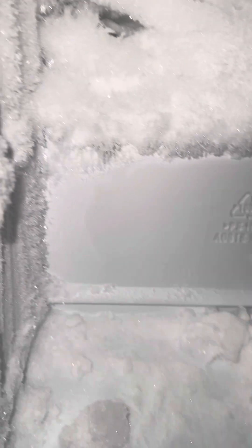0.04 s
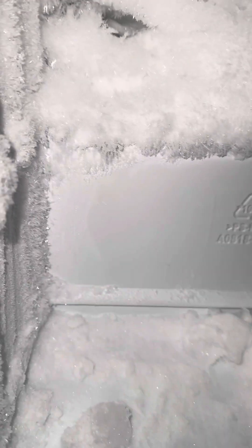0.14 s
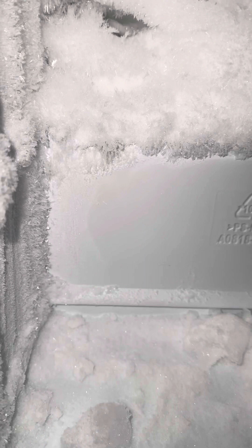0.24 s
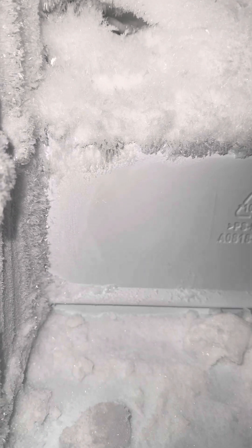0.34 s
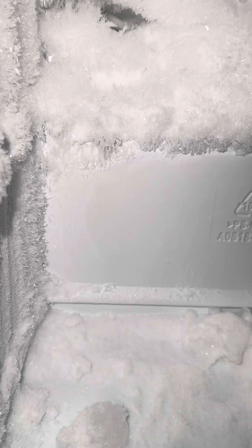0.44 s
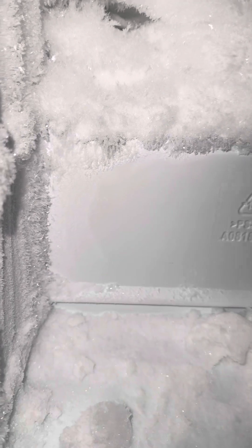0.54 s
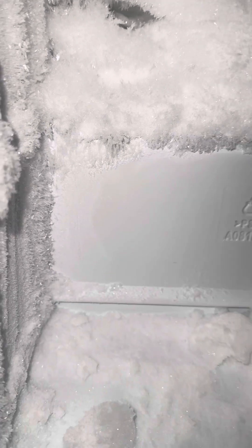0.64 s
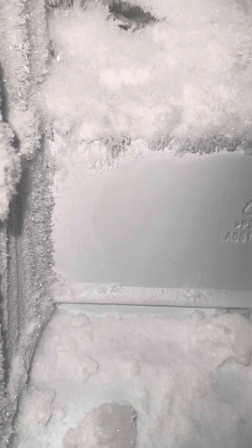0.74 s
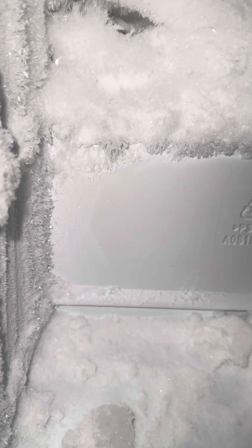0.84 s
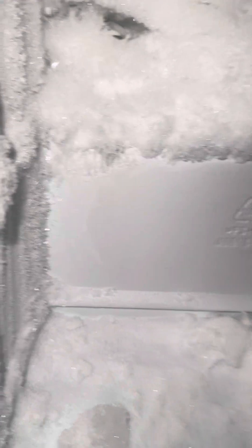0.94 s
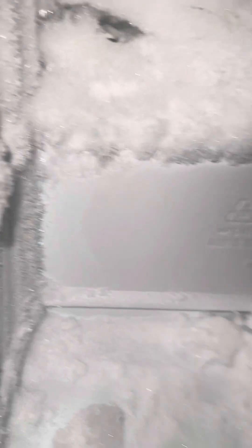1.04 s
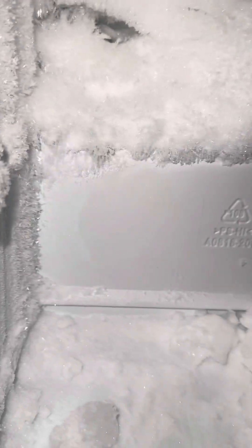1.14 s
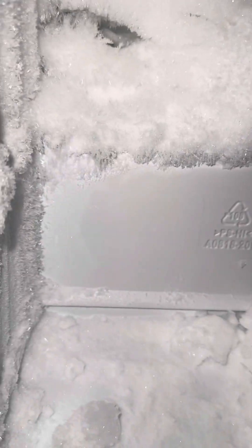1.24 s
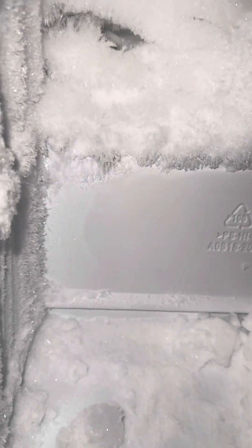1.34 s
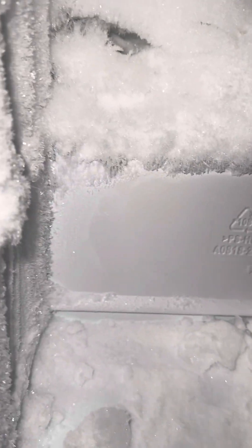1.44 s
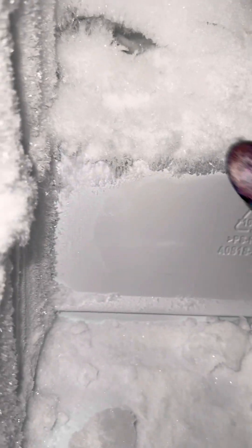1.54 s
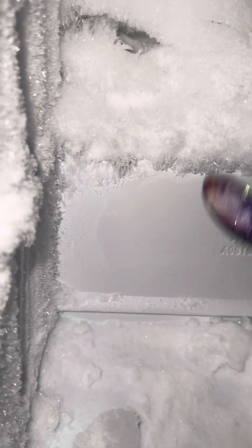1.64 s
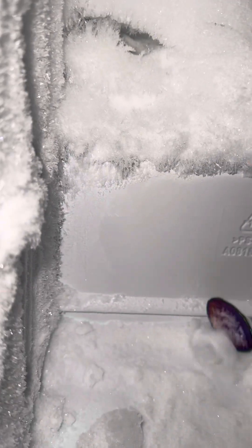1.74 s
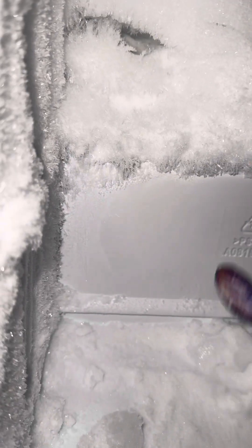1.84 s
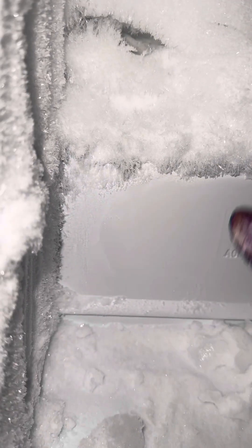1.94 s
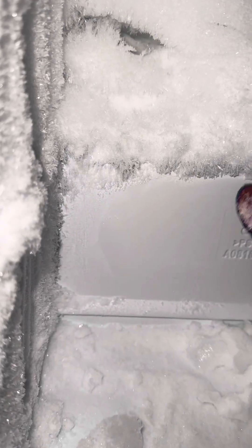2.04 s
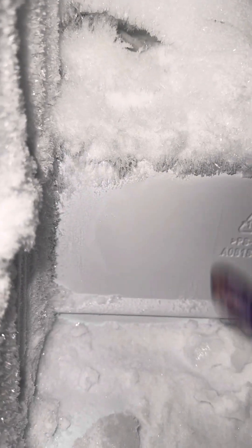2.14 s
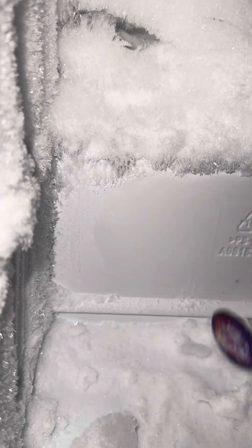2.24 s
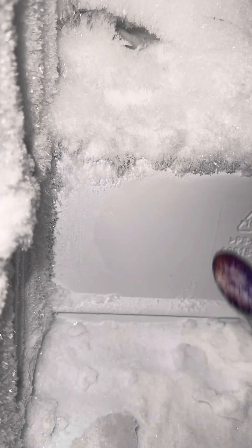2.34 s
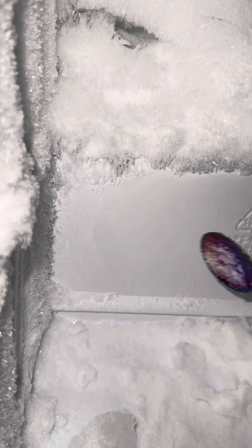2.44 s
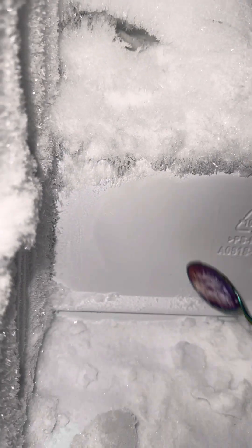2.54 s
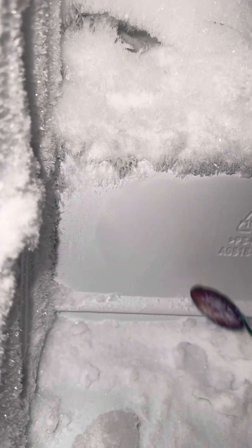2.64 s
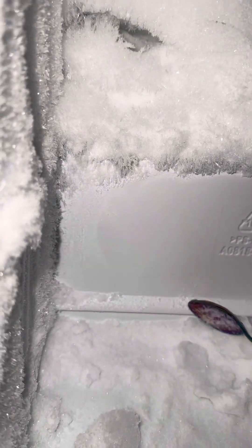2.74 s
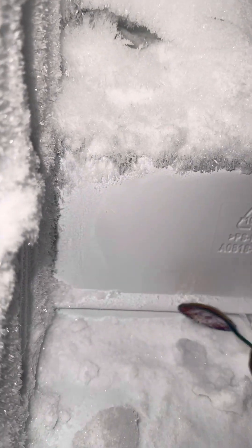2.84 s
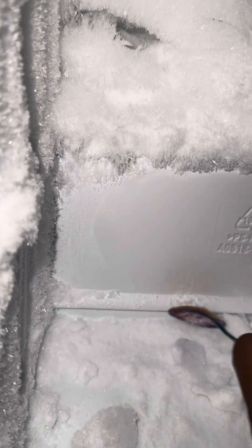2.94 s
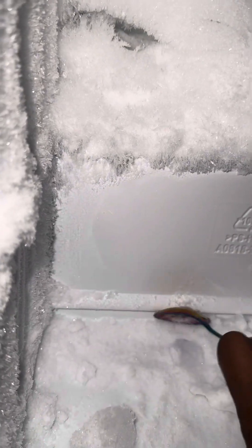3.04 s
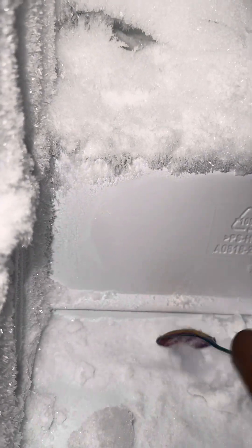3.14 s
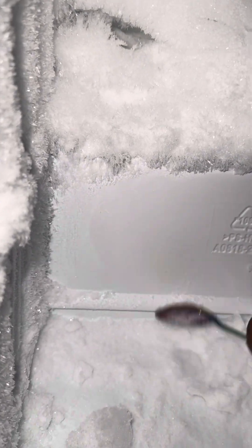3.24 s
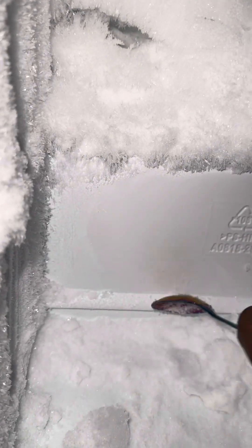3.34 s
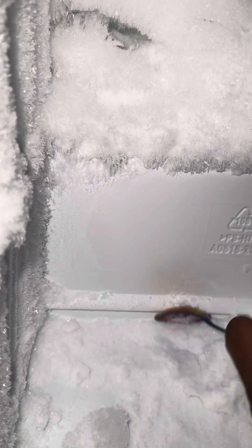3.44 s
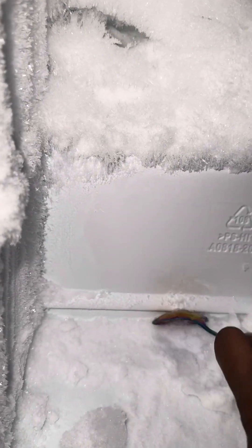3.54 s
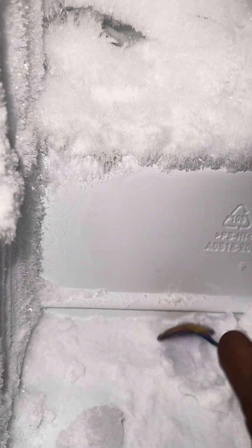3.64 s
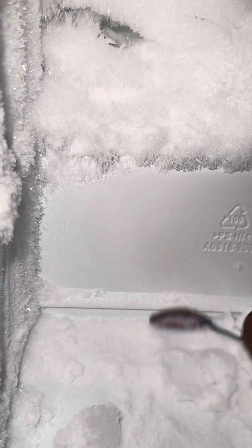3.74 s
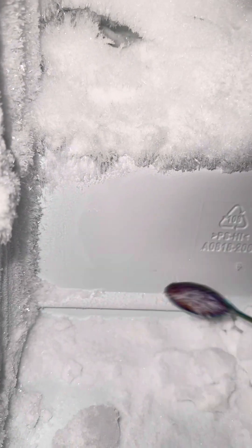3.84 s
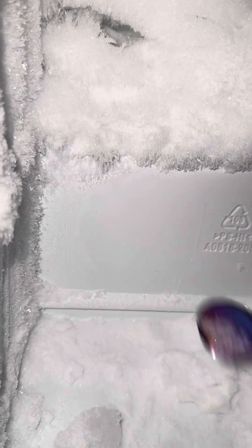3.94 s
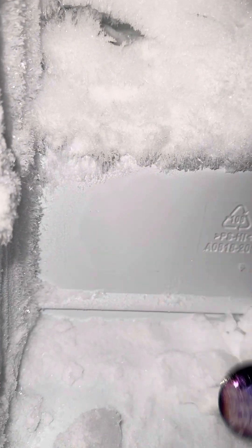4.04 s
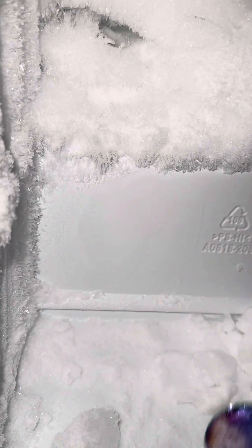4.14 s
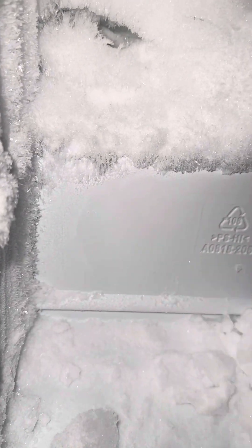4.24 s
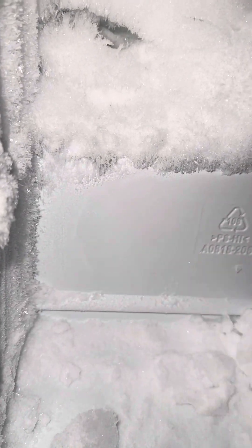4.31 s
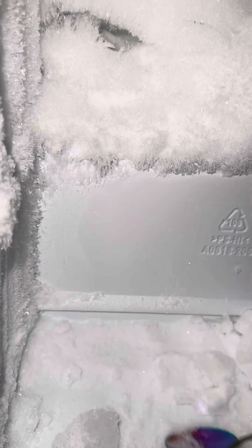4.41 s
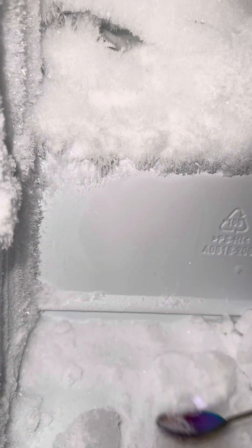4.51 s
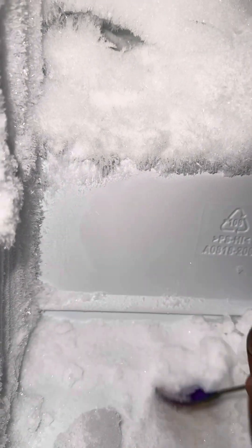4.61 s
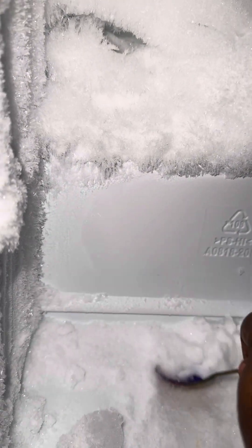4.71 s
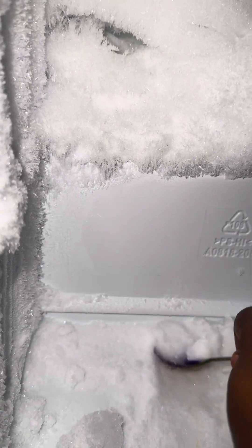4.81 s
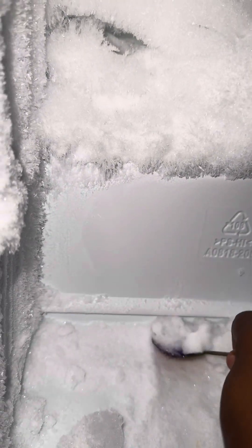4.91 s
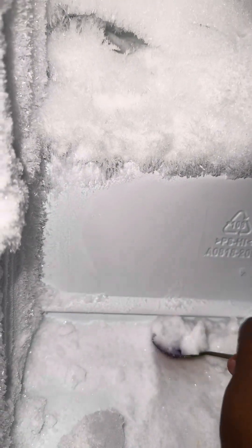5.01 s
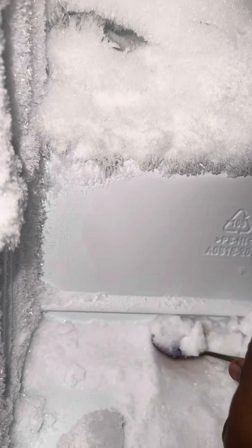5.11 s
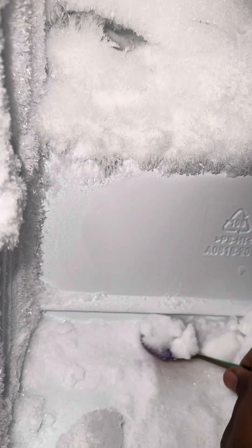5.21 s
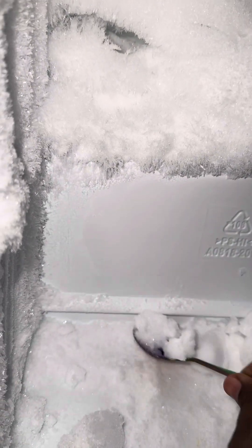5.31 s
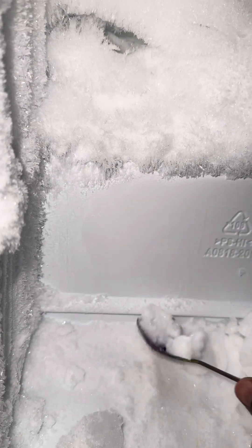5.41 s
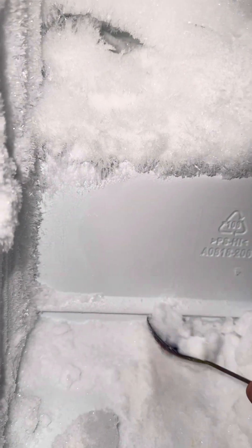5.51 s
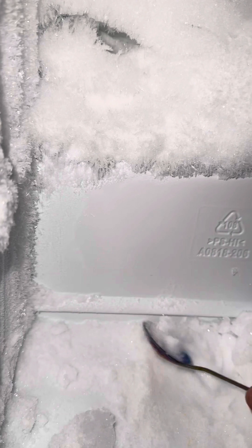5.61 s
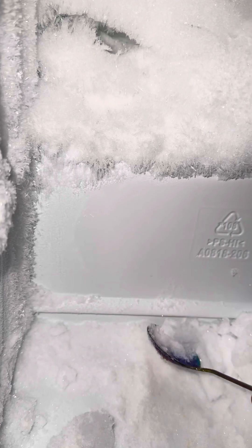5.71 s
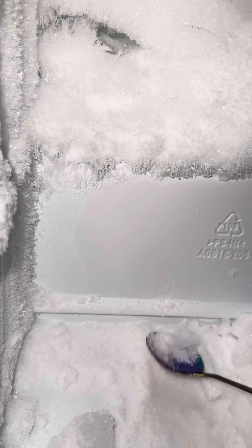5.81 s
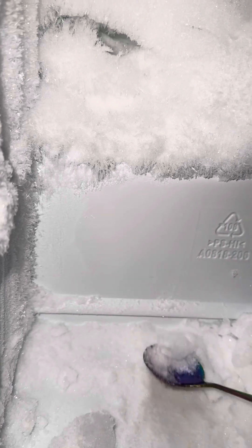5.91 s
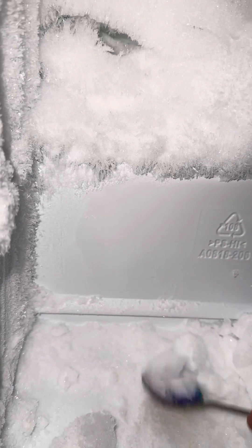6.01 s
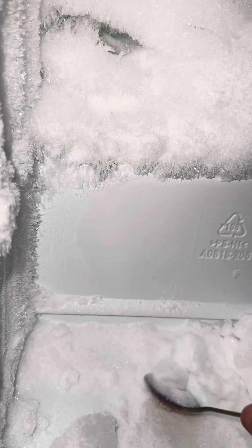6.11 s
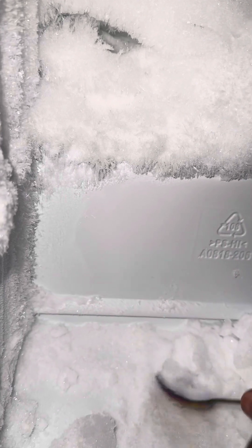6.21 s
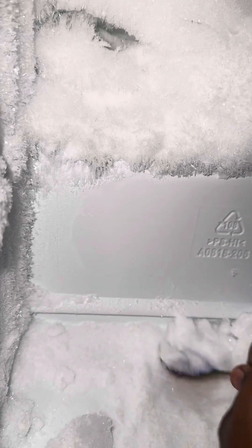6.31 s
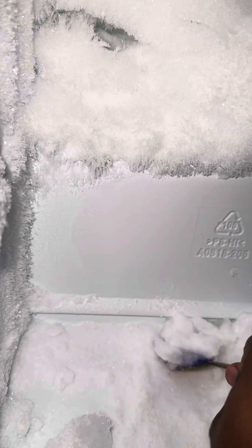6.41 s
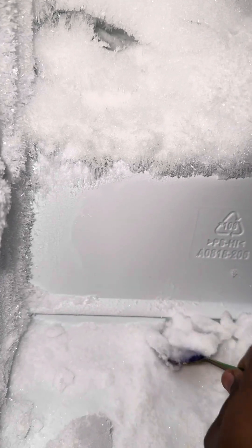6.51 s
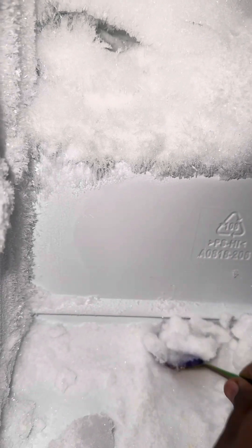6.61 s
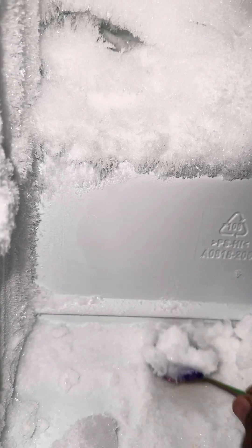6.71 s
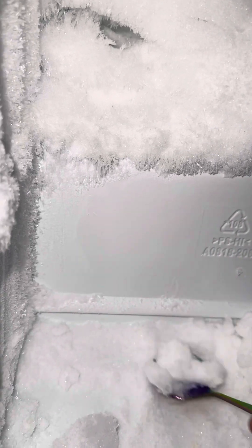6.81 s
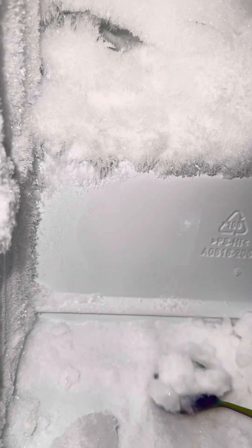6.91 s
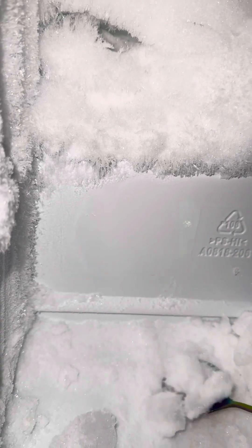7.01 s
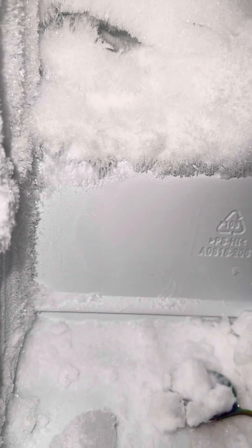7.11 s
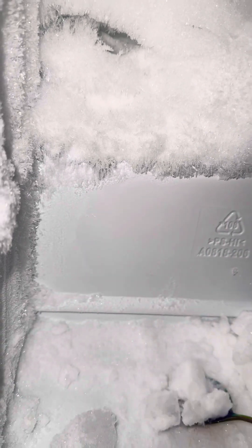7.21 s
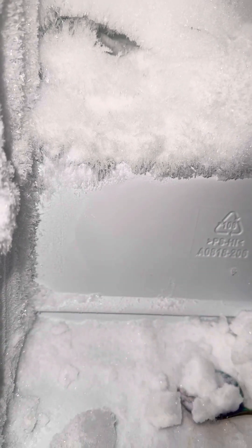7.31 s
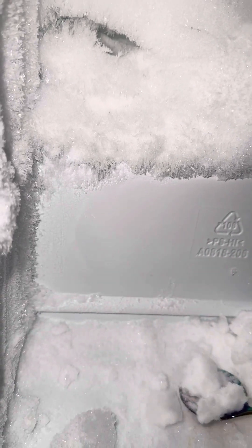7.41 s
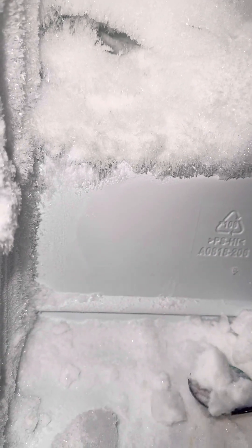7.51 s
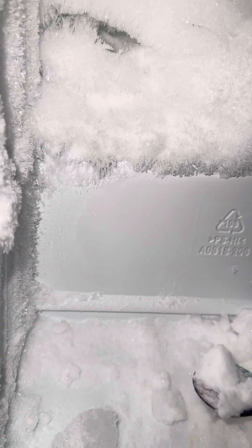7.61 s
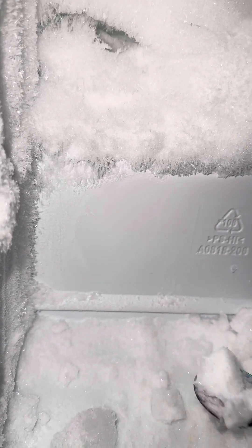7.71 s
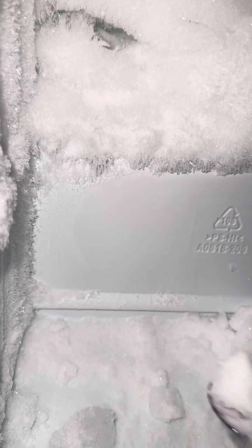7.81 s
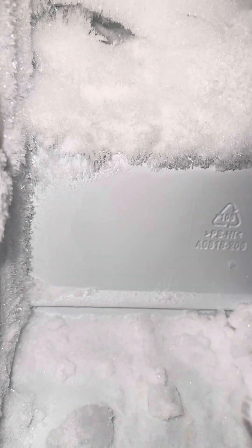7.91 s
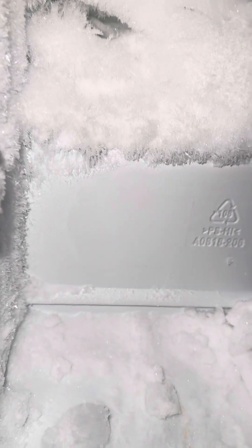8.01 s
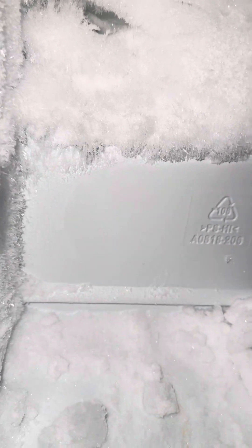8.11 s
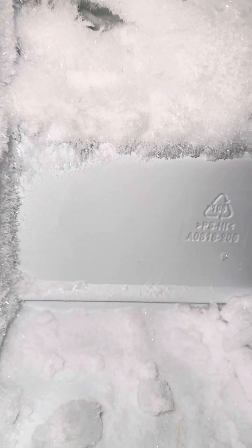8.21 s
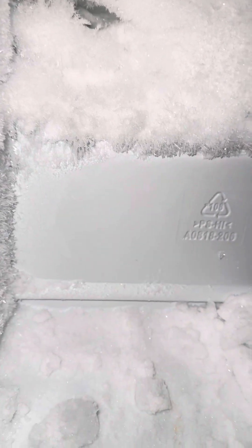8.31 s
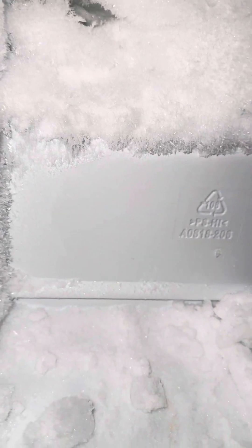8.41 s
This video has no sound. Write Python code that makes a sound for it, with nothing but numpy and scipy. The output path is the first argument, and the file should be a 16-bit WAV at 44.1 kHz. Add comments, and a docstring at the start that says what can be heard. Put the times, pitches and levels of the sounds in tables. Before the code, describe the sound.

Close-up crisp crunching and scraping of a spoon digging into freezer frost, beginning with sharp hard knocks, above a low throbbing appliance hum.

```python
"""Spoon in a frosted freezer

A metal spoon taps, scrapes and scoops thick frost inside a small open freezer in a kitchen.
A two-port microphone listens close by, from inside the box. Crystals crush in clumps, as random
snaps that drive the modes of crust and boxy compartment; knocks, ticks and larger breaks are short
noise bursts. Two motors a little apart in speed hum and beat under smooth fan noise."""
import sys
import numpy as np
from scipy import signal
from scipy.fft import rfft, irfft
from scipy.io import wavfile
from scipy.ndimage import uniform_filter1d

SR = 44100
rng = np.random.default_rng(int(sys.argv[2]) if len(sys.argv) > 2 else 0)


def linear_from_db(decibels):
    """Turn decibels (scalar or array-like) into linear amplitude factors; 0 gives 1."""
    return 10 ** (np.asarray(decibels, float) / 20)


def materialize(psi):
    """Save the field psi as 16-bit PCM at rate SR to the path in sys.argv[1].

    A 1-D psi becomes a single channel; in a 2-D psi each row is a channel.
    """
    bounded = np.clip(np.atleast_2d(psi).T, -1, 1)
    quanta = np.round(bounded * 32767).astype(np.int16)
    wavfile.write(sys.argv[1], SR, quanta)


N = 372777

# motors: (multiple of the motor's speed [1], level [dB rms])
SLOW_ORDERS = [(1, -46), (2, -94.5), (3, -62), (6, -86), (8, -67.5), (9, -68), (10, -77.5), (12, -69.5),
               (33, -77.5)]
FAST_ORDERS = [(1, -41.5), (2, -59.5), (3, -74.5)]
SLOW_HZ, FAST_HZ, MAINS_HZ, MAINS_DB = 59.121, 59.52, 120.017, -66.5
IN_STEP_S = 0.45  # the two motors pull together here

# fan and kitchen air: (frequency [Hz], level [dB per Hz])
AIR_SPECTRUM = [(45, -105), (70, -74), (90, -74.5), (170, -86), (300, -92.5), (520, -90), (750, -88),
                (1000, -100), (1500, -100), (2200, -92), (3100, -104), (4200, -102), (5300, -103),
                (6500, -108), (8000, -120), (16500, -130)]
# likeness of the air at the two ports: (frequency [Hz], left-right likeness [1])
AIR_LIKENESS = [(150, 0.97), (230, 0.73), (350, 0.14), (800, 0.055), (1300, 1), (2000, 0.31), (2800, 1),
                (4000, 0.99), (5000, 0.59), (6200, 0.61), (16000, 1)]

# spoon knocks, thin ticks and breaking crusts:
# (time [s], peak [dB], boom against it [dB], treble spray against it [dB], pitch [Hz])
KNOCKS_AND_BREAKS = [(0.181, -49.5, -35, -32, 2200), (.261, -37.5, -24, -13, 3930),
                     (0.282, -38, -24, -28, 2680), (0.351, -44, -28, -15, 3700),
                     (0.508, -45, -29, -21, 4020), (.57, -46.5, -24, -21, 3500),
                     (0.603, -49.5, -32, -22, 3600), (0.292, -49, 6, -22, 2420),
                     (0.842, -42.5, -3, -31, 2000), (1.079, -33, -40, -28, 4000),
                     (1.089, -13, -43, -20, 4800), (1.093, -14, -38, -2.5, 3700),
                     (1.094, -34, -37, -30, 2100), (1.161, -40.5, -42, -35, 4800),
                     (1.622, -39, -31, -34, 1990), (1.706, -32.5, -36, -35, 1000),
                     (1.7143, -12, -37, 14, 4050), (1.716, 0.5, -1, -29, 1150),
                     (1.7229, -20, 12.5, -36, 597), (1.738, -23, 8, 2, 2200),
                     (1.814, -22.5, -8.5, -0.5, 2150), (2.156, -30.5, -26, -7, 1310),
                     (2.158, -6, -37, 2, 1280), (2.1633, -6.5, -10, 7.5, 2190),
                     (2.177, -24.5, 3, -23, 2000), (2.21, -26.5, -5, -27.5, 1190),
                     (2.299, -28.5, -32, 3, 2300), (2.353, -40, -4, -19, 2327),
                     (2.633, -51, -27.5, -23, 3180), (2.933, -25, -34, -27.5, 2180),
                     (2.959, -31, -17, -11, 2110), (3.097, -15.5, -8, -3, 1520),
                     (3.119, -6, -18, -10, 2000), (3.413, -19.5, -11, -12, 1472),
                     (3.529, -31, -3, -24, 1700), (3.566, -27.5, -27, -33, 1570),
                     (3.907, -44.5, -27, -20, 2400), (3.941, -47, -24, -20, 2000),
                     (4.132, -39.5, -29.5, -28, 2640), (4.186, -44, -25, -9, 1800),
                     (4.296, -32.5, -24, 15.5, 1930), (4.343, -15.5, -13, -2.5, 1500),
                     (4.365, -24, -5, -15, 1110), (4.467, -37, 8, -10, 1495), (4.593, -25.5, 1, -19, 1500),
                     (4.618, -12.5, -35, -22, 1580), (4.664, -20, -25, -20, 1500),
                     (4.711, -41, -23, -18, 1500), (4.685, -16, -40, -22, 1490),
                     (4.741, -36, -26, -10, 1215), (4.78, -20.5, -34, -14, 2000),
                     (4.79, -22.5, -36, -16, 2636), (4.831, -23, -33, -27, 1190),
                     (4.922, -15, -7, -37, 690), (5.073, -36, -25, 5, 2500), (5.212, -42, -25, -27, 2780),
                     (5.288, -39.5, -8, 6, 2520), (5.367, -35, -29, -12, 8300), (5.372, -37, -10, -10, 920),
                     (5.264, -41.5, -17, 4, 4560), (5.272, -40.5, -21, -25, 1350),
                     (5.533, -35.5, 2.5, -28, 700), (5.569, -36.5, -21, 5.5, 1360),
                     (5.623, -31.5, -30, 9.5, 1250), (5.84, -35.5, -28, -24, 1260),
                     (5.943, -36.5, -11, 5, 1120), (5.972, -24, -20, -14, 925), (6.012, -18, 3, 13, 1850),
                     (6.068, -27.5, 8, 15.5, 2000), (6.222, -27.5, -15, -17, 600),
                     (6.266, -43.5, -13, -20, 650), (6.346, -16.5, -30, -25, 1193),
                     (6.366, -14.5, -37, -22, 1170), (6.418, -19, -28, -26, 2530),
                     (6.658, -33, -14, 9.5, 1300), (6.724, -31, -13, 4.5, 1430), (6.742, -43, -21, 7, 1550),
                     (6.76, -44, -17, -20, 900), (6.783, -32, -11, 2, 2340), (6.816, -39, -8, -16, 700),
                     (6.885, -39.5, -13, -25, 900), (6.977, -32, 1, 4, 2170), (7.091, -39, -24, 0, 2090),
                     (7.117, -38, -5, 8, 1640), (7.173, -42.5, -4, 4, 2100), (7.264, -46, -1, -14, 3200),
                     (7.276, -40.5, -12, 3, 2000), (7.297, -36.5, -25, -14, 820), (7.31, -50, -20, 9, 1800),
                     (7.352, -49, -20, -17, 1800), (7.424, -31.5, -7, 1, 900), (7.46, -45, 11, 8, 2000),
                     (7.485, -50, -4, -28, 696), (8.052, -44.5, -37, 6, 1570), (8.052, -26, -40, -33, 2370),
                     (8.049, -22.5, -42, -21, 3830)]
# treble spray of a knock, tick or break: (frequency [Hz], relative level [dB per Hz])
SPRAY_SPECTRUM = [(3000, -40), (5000, 4), (7000, 4.5), (10000, 5), (13000, 5.5), (16000, 0), (16700, -53.5)]
# air modes of the box: (frequency [Hz], width [Hz], relative level [dB])
BOX_MODES = [(205, 29, 5.5), (243.7, 42, -2.5), (393, 30, -3), (598, 200, -3)]
# modes of frost, liner and spoon: (frequency [Hz], width [Hz], relative level [dB])
CRUST_MODES = [(639, 189, 7), (874, 94, -6.5), (1190, 210, 5), (1550, 170, 2.5), (2000, 2000, -9.5),
               (2356, 220, 0), (2600, 460, -4), (3800, 1000, -12.5), (4270, 450, -18)]

# thin ringing after the brightest ticks: (time [s], level [dB], frequency [Hz], 60 dB decay [s])
RINGINGS = [(1.1, -48, 3250, 0.43), (1.1, -65, 4400, 0.36), (8.059, -54, 2660, 0.63)]

# frost that a hard knock shakes loose: (time [s], pressure [dB], tilt [dB per octave])
LOOSE_CRUMBS = [(1.741, -40, -2.5), (2.182, -35.5, 0.5)]
CRUMB_FADE_DB_PER_S, CRUMB_S, CRUMB_BOOM_DB, CRUMB_SIZZLE_DB = 120, 0.2, 1, -16.5
CRUMB_THIN = 2.7  # dB of boom lost for each dB of tilt: bright crumbs are small

# strokes of the edge: (boom against the pressure at a firm push [dB], tilt of the crust [dB per octave],
# sizzle against the pressure at start [dB], at end [dB], curve of (time [s], pressure [dB]))
EDGE_STROKES = [ (0.5, -1.1, -12, -13.5, [(2.74, -80), (2.772, -45.5), (2.81, -42.5), (2.886, -46),
                (2.93, -45)]), (-13, -0.35, -14, -17.5, [(2.93, -45.5), (2.946, -38.5), (2.952, -26.5),
                (2.968, -20.5), (2.986, -34), (2.998, -25.5), (3.018, -36.5), (3.03, -32), (3.046, -32.5),
                (3.068, -29.5), (3.078, -50.5)]), (0, -1.9, -15, -18, [(3.078, -46.5), (3.096, -20.5),
                (3.112, -28), (3.13, -22.5), (3.158, -32.5), (3.176, -43.5), (3.3, -67)]),
                (-8, 0.16, -27.5, -5.5, [(3.405, -89), (3.414, -27.5), (3.437, -33.5), (3.445, -28.5),
                (3.462, -31), (3.474, -26.5), (3.495, -23), (3.512, -46), (3.548, -54)]),
                (-2, 1, -11, -37.5, [(3.548, -62), (3.564, -22), (3.612, -22), (3.652, -21.5),
                (3.675, -31.5), (3.694, -45), (3.85, -69), (4.27, -68)]), (-1.5, 1, -10, -7, [(4.28, -74),
                (4.3, -29), (4.338, -36), (4.352, -29.5), (4.375, -39), (4.404, -37), (4.445, -37),
                (4.46, -29), (4.495, -37), (4.516, -37.5), (4.54, -32.5), (4.565, -33.5), (4.6, -26.5),
                (4.63, -27), (4.652, -36), (4.666, -30.5), (4.678, -35)]),
                (-6.5, 0.94, -11.5, -8, [(4.678, -31), (4.7, -27), (4.736, -37), (4.746, -32), (4.775, -31),
                (4.785, -18.5), (4.797, -33.5), (4.82, -29.5), (4.85, -33.5), (4.9, -33), (4.918, -32),
                (4.94, -43)]), (-5.5, 0.95, -17, -13.5, [(4.94, -35), (4.988, -48), (5.02, -46),
                (5.04, -42.5), (5.06, -44), (5.1, -44), (5.115, -49), (5.158, -42), (5.19, -44),
                (5.205, -58.5), (5.244, -47.5), (5.262, -51.5), (5.292, -50), (5.305, -50), (5.355, -67)]),
                (-1.5, -1.4, -6, -16, [(5.4, -73), (5.512, -43.5), (5.546, -54), (5.632, -41.5),
                (5.684, -57.5), (5.77, -53.5), (5.87, -49), (5.942, -55)]),
                (-5.5, -1.4, -14, -11, [(5.942, -54.5), (5.95, -41), (5.98, -35), (6.008, -47),
                (6.035, -33.5), (6.055, -69.5)]), (-1.5, 0.31, -7, -12.5, [(6.055, -41), (6.085, -37.5),
                (6.143, -41.5), (6.225, -35), (6.243, -36.5), (6.265, -33), (6.288, -33.5), (6.31, -29.5),
                (6.348, -24.5), (6.388, -30), (6.42, -29.5), (6.445, -34), (6.475, -30.5), (6.509, -36.5),
                (6.527, -50), (6.63, -50)]), (-10, -0.77, -17.5, -4.5, [(6.635, -70), (6.654, -53.5),
                (6.812, -47.5), (6.848, -68), (6.906, -68), (6.97, -50.5)]),
                (1, -0.91, -2.5, -23, [(7.0, -55), (7.058, -65.5), (7.124, -48), (7.148, -60), (7.232, -66),
                (7.308, -56), (7.42, -56), (7.488, -53), (7.526, -74)]), ]
# the box swings less than the pressure: share of each dB away from a firm push that it ignores
BOOM_EVEN, FIRM_DB = 0.27, -40
# hiss of the finest crystals: (frequency [Hz], relative level [dB per Hz])
SIZZLE_SPECTRUM = [(2500, -29), (3500, -4), (4600, 3), (5250, 2), (5900, -0.5), (7500, 4), (10000, 2.5),
                   (13000, -12.5), (15800, 3), (16300, -31.5)]
GRAINS_PER_S = 8000  # at full density
TILT_ABOUT_HZ = 1500
SLIDE, SLIDE_S = 0.07, 0.035  # rms share and time by which crust modes slide under the edge

# lead of the right port: (frequency [Hz], phase [radians])
PORT_LEAD = [(750, 0), (1100, .7), (1400, 0), (1900, 0), (2500, 1.4), (3300, 0), (4000, .1), (4500, 1.3),
             (5200, 3.14), (5900, 6.3), (7000, 7.4), (8500, 8.3), (10300, 9.41), (13800, 9.44),
             (15600, 10.1), (16400, 9.6)]
# balance of the ports: (frequency [Hz], left over right [dB])
PORT_LEAN = [(200, 0), (400, -2), (1200, -2.5), (1700, 0), (2400, 3), (3200, 0)]
# wall echoes, unlike at the two ports: (frequency [Hz], level against the direct sound [dB])
WALL_ECHOES = [(150, -52), (250, -22), (400, -5.5), (700, -7), (1100, 1), (1800, -14.5), (2800, -2.5),
               (3700, 0.5), (4700, -4), (5200, -2.5), (5600, -7), (6300, -6), (9300, -2), (10500, -14),
               (13500, -26), (14500, -7)]
SHIFT_S = 0.055  # the echo blend makes a sixth of a turn in this time
BASS_HZ = 134  # below this the box radiates little


def read(points, hz):
    """Joins (Hz, value) points on a log frequency axis."""
    f, value = np.transpose(points)
    return np.interp(np.log(hz + 1), np.log(f + 1), value)


def through(x, h):
    """Convolves and keeps the length."""
    return signal.oaconvolve(x, h)[:len(x)]


def wander(seconds):
    """Slow chance of rms 1: smoothed noise, drawn at every 32nd sample."""
    window = signal.windows.hann(round(2 * seconds * SR / 32))
    x = through(rng.standard_normal(N // 32 + 2), window)
    return np.interp(np.arange(N) / 32, np.arange(len(x)), x / x.std())


def ring(modes, size=4096):
    """The answer of a set of decaying modes to one click, energy 1."""
    t = np.arange(size) / SR
    h = sum(linear_from_db(db) * width * np.exp(-np.pi * width * t) * np.sin(2 * np.pi * hz * t)
            for hz, width, db in modes)
    return h / np.linalg.norm(h)


def colour(points, size=1024):
    """A causal (minimum-phase) click with the given spectrum, energy 1."""
    log_gain = np.log(linear_from_db(read(points, abs(np.fft.fftfreq(size, 1 / SR)))))
    h = np.fft.ifft(np.exp(np.conj(signal.hilbert(log_gain)))).real
    return h / np.linalg.norm(h)


def thin(x, hz=430):
    """The brittle crust gives off little below its lowest mode."""
    return signal.sosfilt(signal.butter(3, hz, "high", fs=SR, output="sos"), x)


def hum():
    """Two motors beat slowly against each other; their third orders oppose where the others agree."""
    t = np.arange(N) / SR - IN_STEP_S
    slow = sum(linear_from_db(db) * np.cos(2 * np.pi * k * SLOW_HZ * t) for k, db in SLOW_ORDERS)
    fast = sum(linear_from_db(db) * (-1) ** (k == 3) * np.cos(2 * np.pi * k * FAST_HZ * t) for k, db in FAST_ORDERS)
    mains = linear_from_db(MAINS_DB) * np.cos(2 * np.pi * MAINS_HZ * t)
    return np.sqrt(2) * (slow + fast + mains)


def air(patchy_db=0.3):
    """Smooth fan noise as random short-time spectra, partly alike at the two ports."""
    frames, hz = N // 256 + 5, np.fft.rfftfreq(1024, 1 / SR)
    a, b, c, d, patches = rng.standard_normal((frames, 513, 5)).T
    patches = uniform_filter1d(uniform_filter1d(patches, size=12, axis=0), size=14, axis=1)
    same = np.clip(read(AIR_LIKENESS, hz), -1, 1)[:, None]
    # the right port leads only where its lead exceeds one full turn
    lead = np.exp(1j * np.maximum(read(PORT_LEAD, hz) - 2 * np.pi, 0))[:, None]
    left = a + 1j * b
    right = same * left * lead + np.sqrt(1 - same ** 2) * (c + 1j * d)
    level_db = read(AIR_SPECTRUM, hz)[:, None] + patchy_db * patches / patches.std()
    spectra = np.array([left, right]) * linear_from_db(level_db)
    return np.sqrt(SR / 1024) * signal.istft(spectra, nperseg=1024, noverlap=768)[1][:, :N]


def knocks_and_breaks(rise_s=0.002, shove_s=0.0024, lag_s=0.00501, dies_s=0.06, snap_share=0.17,
                      after_db=-23, click_db=9):
    """Each knock, tick or break is a short noise burst: own tone, crust, treble spray, push into the box."""
    out, t = np.zeros(N + SR), np.arange(SR // 8) / SR
    crust, spray = thin(ring(CRUST_MODES)), colour(SPRAY_SPECTRUM)
    # the liner gives and returns
    shove = np.sin(2 * np.pi * (t - lag_s) / shove_s) * (t > lag_s) * (t < lag_s + shove_s)
    thud = through(shove, ring(BOX_MODES))
    # a snap, then a weaker tail
    fade = linear_from_db(-60 * t / (snap_share * dies_s)) + linear_from_db(after_db - 60 * t / dies_s)
    envelope = (1 - np.exp(-t / rise_s)) ** 2 * fade
    noise = rng.standard_normal((len(KNOCKS_AND_BREAKS), len(t)))
    for (s, db, boom_db, spray_db, hz), snaps in zip(KNOCKS_AND_BREAKS, noise):
        burst = snaps * envelope
        burst[round(2 * rise_s * SR)] += linear_from_db(click_db)  # one clean snap
        own = np.diff(ring([(hz, 0.3 * hz, 0)], size=512), prepend=0)  # small pieces radiate no bass
        tone = through(burst, own / np.linalg.norm(own))
        tone += (1200 / hz) ** 2.8 * through(burst, crust)  # low ones shake more of the crust
        tone = uniform_filter1d(tone, size=round(SR / hz / 3))  # and are duller
        parts = (tone, 0), (through(burst, spray), spray_db), (thud, boom_db)
        at = round(s * SR)
        out[at:at + len(t)] += sum(linear_from_db(db + part_db) * part / abs(part).max() for part, part_db in parts)
    return out[:N]


def rings(width_hz=500):
    """Diffuse ringing: noise in a narrow band fades after a bright tick, for a quarter second at most."""
    out, t = np.zeros(N + SR), np.arange(SR // 4) / SR
    for (s, db, hz, t60), noise in zip(RINGINGS, rng.standard_normal((len(RINGINGS), len(t)))):
        mode = thin(ring([(hz, width_hz, 0)]), hz / 2)
        out[round(s * SR):][:len(t)] += through(noise * linear_from_db(db - 60 * t / t60), mode)
    return out[:N]


def touch():
    """Drive of crust, box and sizzle over time, and the tilt of the crust, from strokes and crumbs."""
    t, drive = np.arange(N) / SR, np.full((4, N), 1e-9)
    crumbs = []
    for s, db, tilt_db in LOOSE_CRUMBS:
        curve = [(s, db), (s + CRUMB_S, db - CRUMB_FADE_DB_PER_S * CRUMB_S)]
        boom_db = CRUMB_BOOM_DB - CRUMB_THIN * tilt_db
        crumbs.append((boom_db, tilt_db, CRUMB_SIZZLE_DB, CRUMB_SIZZLE_DB, curve))
    for boom_db, tilt_db, first_db, last_db, curve in EDGE_STROKES + crumbs:
        s, db = np.transpose(curve)
        now = (t >= s[0]) & (t < s[-1])
        press_db = np.interp(t[now], s, db)
        box_db = press_db + boom_db + BOOM_EVEN * (FIRM_DB - press_db)
        sizzle_db = press_db + np.interp(t[now], s[[0, -1]], [first_db, last_db])
        drive[:3, now] = linear_from_db([press_db, box_db, sizzle_db])
        drive[3, now] = tilt_db
    return uniform_filter1d(drive, size=100, axis=1)


def grit(breaks, own_db=2.0, own_s=0.012, drift_db=1.6, drift_s=0.08):
    """One patch of frost snaps when crystals break, with slow swells of its own; rms 1."""
    swell_db = own_db * wander(own_s) + drift_db * wander(drift_s)
    snaps = breaks * rng.standard_normal(N) * linear_from_db(swell_db)
    return snaps / snaps.std()


def sliding(x, hz, width):
    """One mode whose pitch wanders as the crust's shape changes under the edge; energy about 1."""
    pitch = hz * (1 + SLIDE * wander(SLIDE_S))
    turn, r = np.exp(2j * np.pi * np.cumsum(pitch) / SR), np.exp(-np.pi * width / SR)
    # shift the mode down to 0 Hz, let it decay there, and shift it back
    return 2 * np.sqrt(1 - r) * (turn * signal.lfilter([1], [1, -r], x / turn)).imag


def scrape(clump_db=2.4, clump_s=0.004, spread_db=2.2, dense_db=-36, steady_load=2.4):
    """The edge drives crust, box and sizzle; a light touch breaks fewer crystals, so it sounds sparser."""
    press, box_push, sizzle_push, tilt_db = touch()
    density = np.clip(press / linear_from_db(dense_db) / 1.5, 0.15, 1)
    breaks = (rng.random(N) < density * GRAINS_PER_S / SR) / np.sqrt(density)
    size_db = spread_db * np.minimum(rng.exponential(1, N), 4)  # a few are large
    breaks *= linear_from_db(clump_db * wander(clump_s) + size_db)
    crust = np.zeros(N)
    for hz, width, db in CRUST_MODES:
        tilted = press * linear_from_db(tilt_db * np.log2(hz / TILT_ABOUT_HZ))
        crust += linear_from_db(db) * np.sqrt(width) * sliding(tilted * grit(breaks), hz, width)
    # the box answers the whole load, so single snaps stand out less
    boom = through(box_push * grit(steady_load + breaks), ring(BOX_MODES))
    dust = grit(breaks) + 0.62 * rng.standard_normal(N)  # the finest crystals merge into a hiss
    sizzle = through(sizzle_push * dust, colour(SIZZLE_SPECTRUM))
    return linear_from_db(-33.5) * thin(crust) + linear_from_db(-4.5) * boom + linear_from_db(1.5) * sizzle


def ports(x, t60=0.0091, first_s=0.00034, kitchen_db=-25, kitchen_t60=0.45):
    """The right port leads in the treble; rough walls and kitchen echo, in a steadily turning blend."""
    size = 16384
    early = size // 16  # room ahead of the direct sound for its phase lead
    hz, t = np.fft.rfftfreq(size, 1 / SR), np.arange(size) / SR
    walls = rng.standard_normal((3, 2, size)) * linear_from_db(-60 * t / t60) * (t > first_s)
    kitchen = rng.standard_normal((3, 1, size)) * linear_from_db(-60 * t / kitchen_t60) * (t > t60 / 2) * (t < 0.3)
    kitchen *= linear_from_db(kitchen_db) / np.linalg.norm(kitchen, axis=2, keepdims=True)
    echo = linear_from_db(read(WALL_ECHOES, hz))
    share = 1 / np.sqrt(1 + echo ** 2)  # direct and wall echoes keep their summed power
    lead = np.exp(0.5j * np.outer([-1, 1], read(PORT_LEAD, hz)))
    lead *= linear_from_db(np.outer([0.5, -0.5], read(PORT_LEAN, hz)))
    direct = np.roll(irfft(share * lead), early, 1)
    walls = rfft(walls)
    # each random echo pattern is evened out; WALL_ECHOES sets its colour
    walls /= np.sqrt(uniform_filter1d(abs(walls) ** 2, size=80, axis=2))
    tails = np.roll(irfft(share * echo * walls + lead * rfft(kitchen)), early, 2)
    # three echo patterns take turns at constant power, standing for the moving spoon
    turn = np.pi * (np.arange(N) / SR / SHIFT_S + np.arange(3)[:, None]) / 3
    places = np.sqrt(2 / 3) * np.cos(turn) * x
    echoes = signal.oaconvolve(places[:, None], tails, axes=2).sum(0)
    out = signal.oaconvolve(x[None], direct, axes=1) + echoes
    return out[:, early:][:, :N]


def scene():
    """Spoon in the box, over hum and air; so small a box radiates no deep bass."""
    no_bass = signal.butter(4, BASS_HZ, "high", fs=SR, output="sos")
    spoon = signal.sosfilt(no_bass, scrape() + knocks_and_breaks() + rings())
    return ports(spoon) + hum() + air()


def low_pass(x):
    """Removes everything above the highest recorded frequency."""
    return signal.sosfilt(signal.butter(12, 16480, fs=SR, output="sos"), x)


def record(dry):
    """The microphone signal meets a hard ceiling at full scale."""
    mix = np.clip(dry, -1, 1)
    return low_pass(mix)


dry = scene()
out = record(dry)
materialize(out)
```